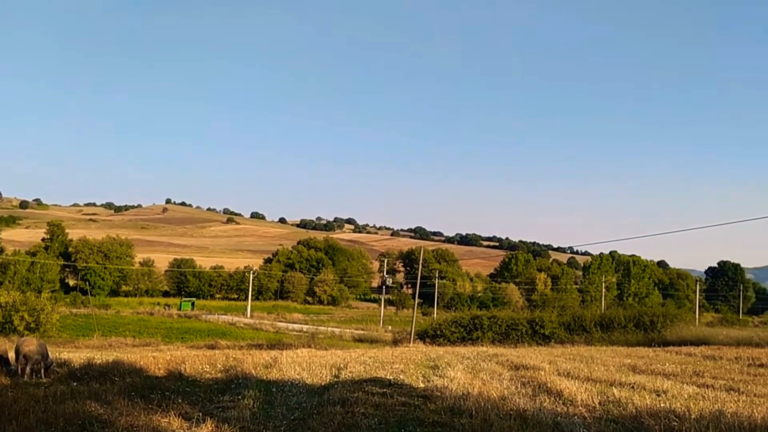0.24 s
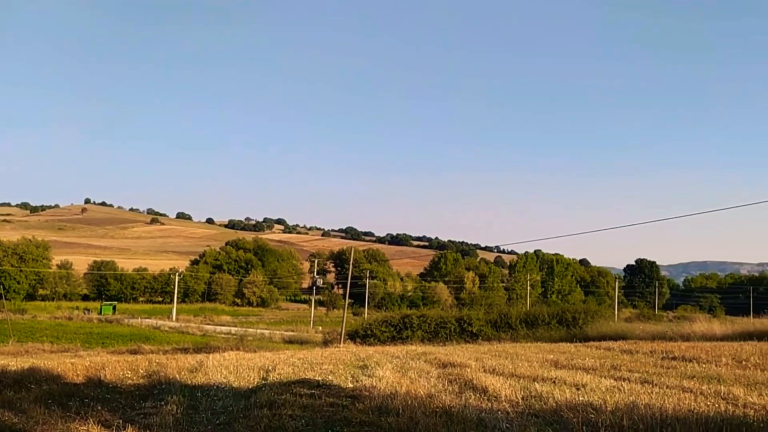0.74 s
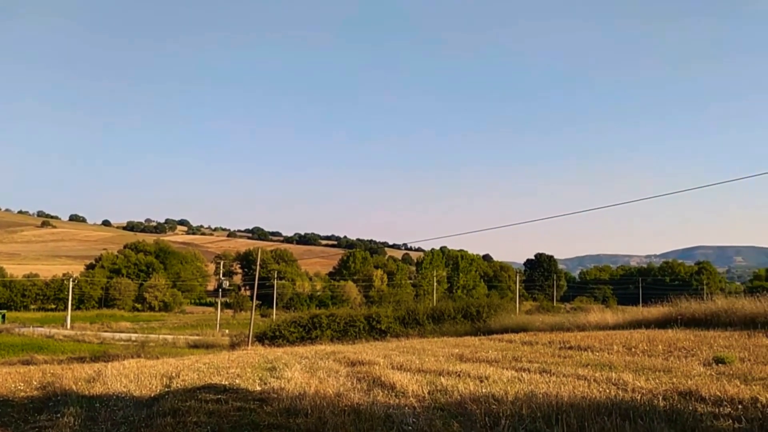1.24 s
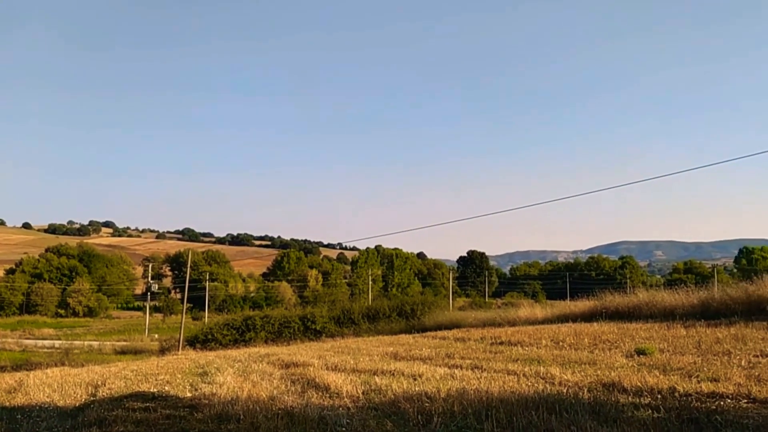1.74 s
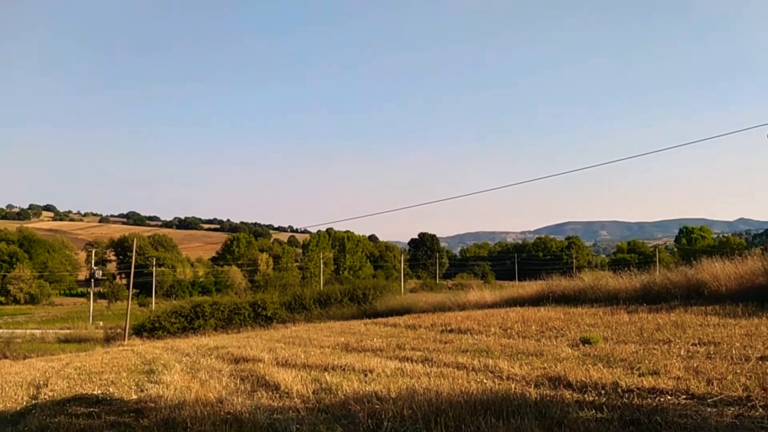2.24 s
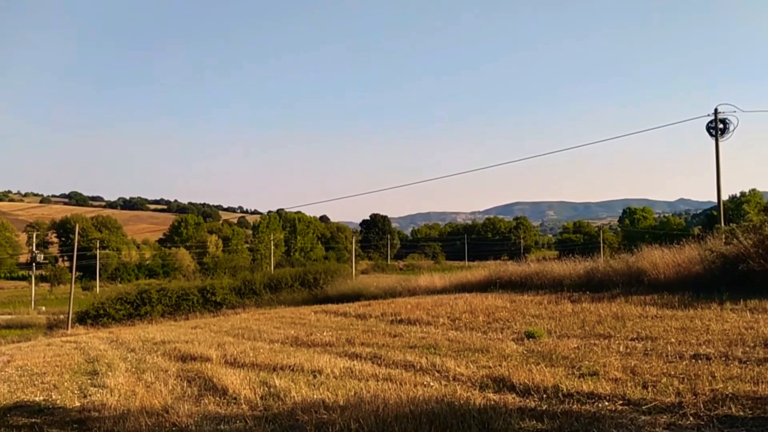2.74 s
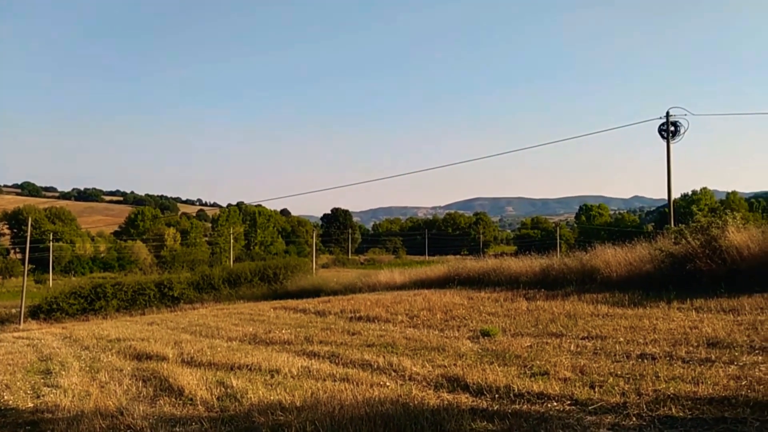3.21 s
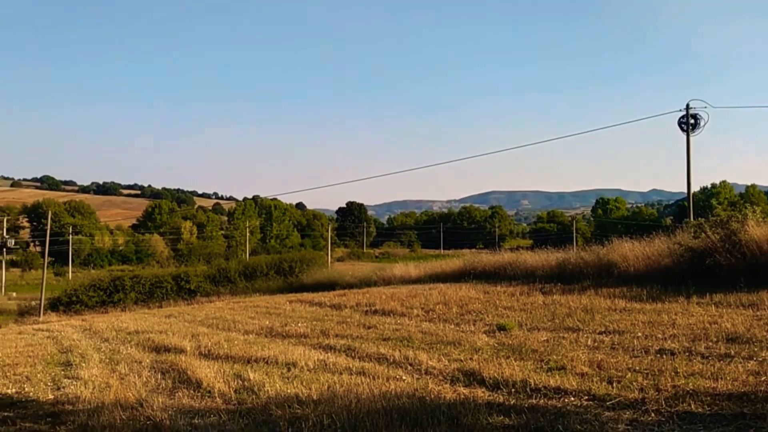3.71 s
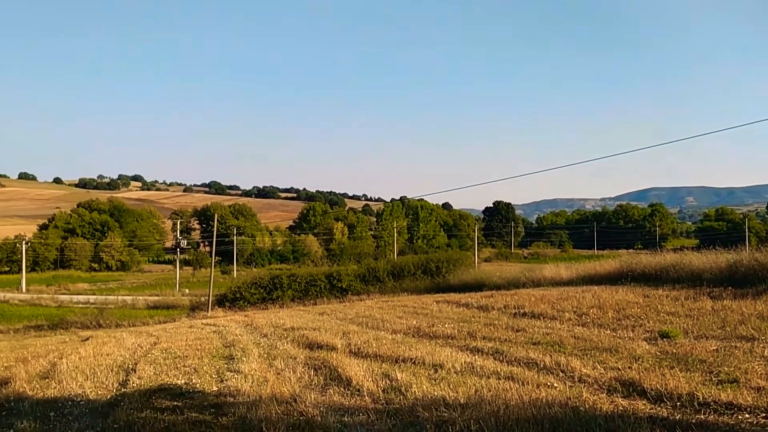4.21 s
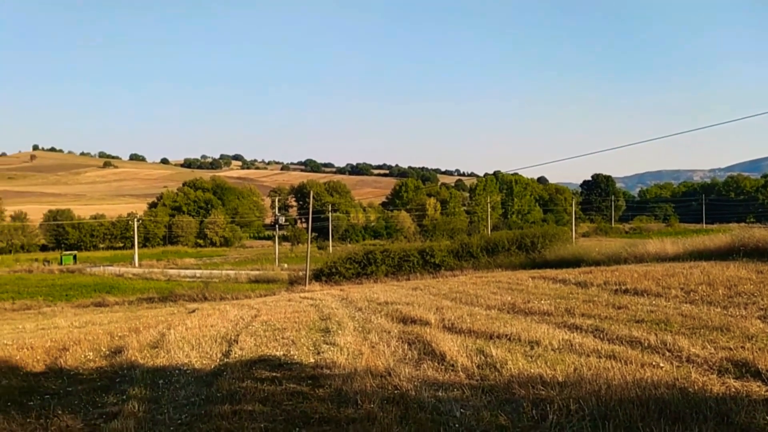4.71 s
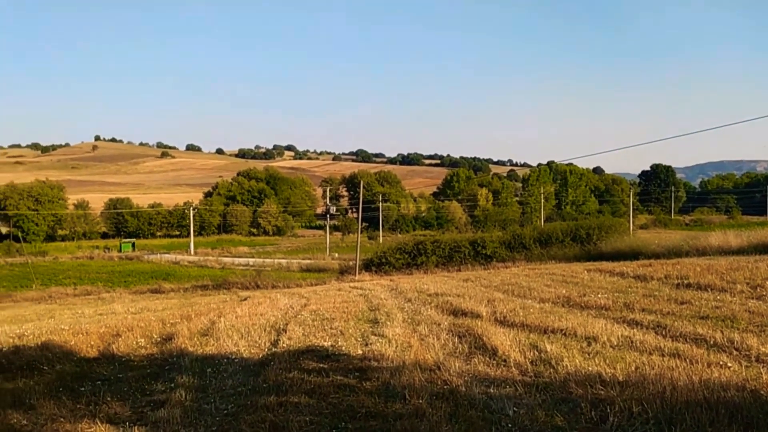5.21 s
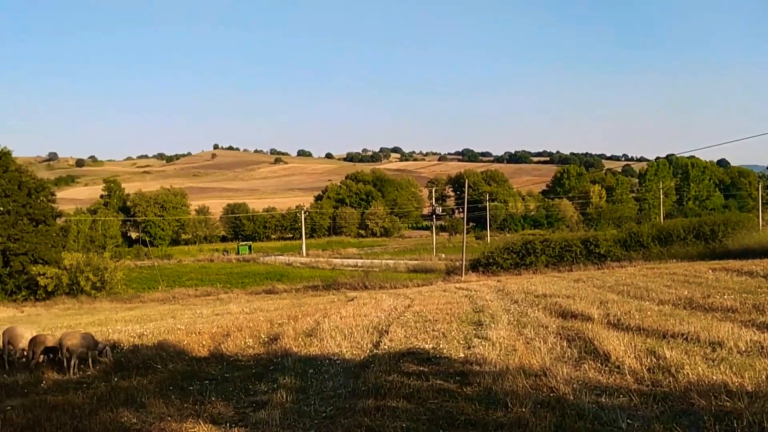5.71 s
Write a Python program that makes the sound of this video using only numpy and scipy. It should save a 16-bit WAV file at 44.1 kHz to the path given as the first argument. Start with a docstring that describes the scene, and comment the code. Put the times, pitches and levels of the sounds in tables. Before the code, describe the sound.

Sheep graze nearby in dry stubble, their bells tinkling unevenly as stalks rustle and snap in a faint breeze.

```python
"""A stubble field at dusk, among grazing sheep, on a phone's two microphone ports; the phone turns
slowly away from the flock and back. Nearby, clappers clink in a small and a larger neck bell; a low
bell knocks far off. Dry stalks rustle and snap under mouths and hooves. Light wind puffs on the left
port, over a faint country rumble and one distant chirp."""
import sys
import numpy as np
from scipy import signal
from scipy.fft import rfft, irfft, next_fast_len
from scipy.io import wavfile
from scipy.ndimage import uniform_filter1d

SR = 44100
rng = np.random.default_rng(int(sys.argv[2]) if len(sys.argv) > 2 else 0)


def inscribe(sig):
    """Save sig as 16-bit PCM at rate SR to the path in sys.argv[1].

    A 1-D sig is mono; a 2-D sig holds one channel per row.
    Samples are clipped to [-1, 1] before scaling.
    """
    pcm = np.round(np.clip(np.atleast_2d(sig).T, -1, 1) * 32767)
    wavfile.write(sys.argv[1], SR, pcm.astype(np.int16))


N = 262395

# the flock in the stubble: (time [s], stalk level [dB], tread level [dB])
GRAZING = [(0.0, -61.5, -74.5), (0.6, -60.5, -66.5), (1.4, -62.5, -73), (1.94, -55.5, -65.5),
           (2.37, -58, -67.5), (2.77, -51, -58.5), (2.95, -60, -66), (3.35, -53.5, -60.5), (3.8, -63, -61),
           (4.21, -59.5, -65.5), (4.44, -52, -58.5), (4.7, -48.5, -54), (4.81, -50.5, -58),
           (4.94, -51.5, -59), (5.07, -55, -67.5), (5.42, -55, -59.5), (5.58, -45.5, -54.5),
           (5.74, -49.5, -59.5), (5.95, -53.5, -65.5)]


def undb(db):
    """Decibels to gain."""
    return 10 ** (np.asarray(db) / 20)


def sides(pan_db):
    """Left and right gains of constant total power; pan is left minus right."""
    gain = undb(np.array([pan_db, -pan_db]) / 2)
    return gain / np.sqrt(np.mean(gain ** 2, axis=0))


def colour(x, points):
    """Shape a noise by (frequency [Hz], level [dB]) points; rms 1."""
    hz, db = np.transpose(points)
    size = next_fast_len(N)
    log_hz = np.log(np.arange(size // 2 + 1) * SR / size + 1)
    gain = undb(np.interp(log_hz, np.log([hz[0] / 2, *hz, hz[-1] * 2]), [db[0] - 40, *db, db[-1] - 40]))
    y = irfft(rfft(x, size) * gain, size)[..., :N]
    return y / np.sqrt(np.mean(y ** 2))


def walk(rate):
    """Random levels held 1 / rate s and smoothed twice; spread near 1."""
    k = int(SR / rate)
    steps = np.repeat(rng.standard_normal(N // k + 1), k)
    return 1.7 * uniform_filter1d(uniform_filter1d(steps, k), k)[:N]


def add(out, s, x):
    """Mix a short stereo sound in at s seconds."""
    i = int(s * SR)
    out[:, i:i + x.shape[1]] += x[:, :N - i]


def follow(curve):
    """Columns of a timed curve at every sample."""
    s, *columns = np.transpose(curve)
    return [np.interp(np.arange(N) / SR, s, c) for c in columns]


def at_blows(curve, blows):
    """A timed curve at the clapper blows, one row each."""
    s, *columns = np.transpose(curve)
    return np.transpose([np.interp(np.transpose(blows)[0], s, c) for c in columns])


def burst(hz, ms):
    """Noise about an octave wide that swells and dies in milliseconds; peak 1 at each port."""
    age = np.arange(1024) / SR * 1000 / ms
    noise = 0.71 * rng.standard_normal(len(age)) + 0.68 * rng.standard_normal((2, len(age)))
    band_hz = [hz / (1.3 if hz > 6000 else 1.9), min(hz * 1.27, 16000)]
    band = signal.butter(2, band_hz, "band", fs=SR, output="sos")
    x = signal.sosfilt(band, noise * age * np.exp(-2 * age))
    return x / np.abs(x).max(axis=1, keepdims=True)


def field():
    """Far rumble and air hiss, wavering slowly, with the breeze on both ports."""
    # open country: (frequency [Hz], density [dB])
    air_spectrum = [(15, 19), (25, -2), (80, 2.5), (114, -3), (141, -6), (300, -13.5), (700, -21.5),
                    (1500, -25.5), (3000, -59), (5000, -20.5), (7500, -32), (9500, -35), (12000, -15),
                    (16000, -19)]
    # its slow swell: (time [s], gain [dB])
    air_swell = [(0, 0.5), (.7, 0.8), (1.4, -1.5), (2.7, 1.9), (4.2, -1), (5.2, 0.4), (5.95, 1.5)]
    # deepest wind rumble: (time [s], level [dB])
    breeze_levels = [(0, -69.5), (3.4, -71), (3.64, -56.5), (3.8, -66.5), (5, -68), (5.95, -54)]
    air = 0.75 * rng.standard_normal(N) + 1.16 * rng.standard_normal((2, N))
    breeze = 0.74 * rng.standard_normal(N) + rng.standard_normal((2, N))
    breeze = colour(breeze, [(15, -7), (30, -3.0), (50, -5.5)]) * undb(follow(breeze_levels)[0])
    air_db = -58 + follow(air_swell)[0] + 1.4 * walk(3.98)
    return colour(air, air_spectrum) * undb(air_db) * sides(0.74)[:, None] + breeze


def far_bird():
    """One faint chirp in the distance: an arching tone made husky by fast flutter."""
    # the arch: (time [s], pitch [Hz])
    pitch_arch = [(.66, 2700), (.70, 3080), (.78, 2730)]
    s, hz = np.transpose(pitch_arch)
    time = np.arange(s[0], s[-1], 1 / SR)
    tone = np.sin(2 * np.pi * np.cumsum(np.interp(time, s, hz)) / SR)
    tone *= walk(400)[:len(time)] * np.hanning(len(time))
    out = np.zeros((2, N))
    add(out, s[0], undb(-68) * np.array([tone, tone]))
    return out


def wind_puffs():
    """Gusts tumble over the left port and thump it."""
    # gusts: (time [s], length [s], level [dB], upper edge [Hz])
    port_gusts = [(1.936, 0.019, -58, 496), (2.039, 0.0078, -53.5, 490), (2.087, 0.02, -55, 597),
                  (2.199, 0.017, -53.5, 500), (2.315, 0.054, -53, 547), (2.871, 0.01, -49.5, 337),
                  (3.412, 0.028, -49.5, 570), (3.644, 0.022, -52, 535), (4.902, 0.069, -47.5, 790)]
    out = np.zeros((2, N))
    for s, length, db, top_hz in port_gusts:
        size = int(length * SR)
        band = signal.butter(2, [120, top_hz], "band", fs=SR, output="sos")
        gust = signal.sosfilt(band, rng.standard_normal(size + 2000))[2000:]
        add(out, s, undb(db) * np.array([[1], [.15]]) * gust / gust.std() * np.hanning(size) ** 0.11)
    return out


def grains(rate, scatter_db, alike):
    """Dense tiny cracks of uneven size; both ports share the fraction `alike` of their power."""
    sizes = (rng.random(N) < rate / SR) * undb(scatter_db * rng.exponential(size=N).clip(0, 3.5))
    tail = np.exp(-np.arange(200) / SR / .0008)
    envelope = np.sqrt(signal.fftconvolve(sizes ** 2, tail)[:N].clip(0))
    shared = np.sqrt(alike) * rng.standard_normal(N)
    return envelope * (shared + np.sqrt(1 - alike) * rng.standard_normal((2, N)))


def rustle():
    """Grass tearing crackles in the treble; hooves and bodies in the stubble give duller noise."""
    # tearing and treading: (frequency [Hz], density [dB])
    stalk_spectrum = [(900, -10.5), (1500, -6), (2900, -8), (3600, -9), (4600, -16.5), (6900, -9.5),
                      (8500, 1), (9840, 4.04), (11500, -8.5), (13000, -11.5), (16000, -37)]
    tread_spectrum = [(100, -10), (200, -3), (500, -3.5), (1000, -6), (2000, -7), (4000, -16)]
    stalk_db, tread_db = follow(GRAZING)
    stalks = colour(grains(1400, 0.52, alike=0.021), stalk_spectrum) * undb(stalk_db + 1.7 * walk(25))
    stalks *= sides(2.9 + 1.1 * walk(3.59))
    tread = colour(grains(900, 1.17, alike=0.57), tread_spectrum) * undb(tread_db + 1.76 * walk(35))
    return stalks + tread


def snaps_and_clanks(lesser_per_s=25):
    """Sharp clicks: stalk snaps and the clank of clappers on the bells; lower ones last longer.
    Lesser stalk snaps come at random, louder as the rustle swells."""
    # snaps and clanks: (time [s], peak [dB], pitch [Hz], pan [dB])
    sharp_clicks = [(0.232, -16.5, 7800, -24), (.3087, -38, 3200, 17), (0.31, -33, 9500, 4),
                    (0.4194, -38, 7900, 17), (0.4533, -33.5, 2650, 9), (0.4552, -33.5, 9100, 22),
                    (.642, -32.5, 6500, 6), (1.296, -40, 7740, 3), (1.5598, -37, 7360, 2),
                    (2.3146, -40, 5450, -19), (2.495, -43.5, 1300, 1.1), (2.7734, -30, 2120, 8),
                    (2.786, -47, 2170, 18), (3.0051, -45, 2200, .1), (3.033, -39, 10500, 3),
                    (3.0905, -43, 900, 3), (3.2128, -42.5, 3000, 5), (3.4248, -36, 7800, -2),
                    (3.659, -38, 9300, 6), (3.8253, -36.5, 9500, 15), (3.8665, -34.5, 11200, -2.1),
                    (4.693, -28.5, 9600, 4), (4.718, -27.5, 6500, 7), (4.7325, -25, 10200, 5),
                    (4.7774, -30, 8100, 19), (4.8907, -36.5, 2270, -22), (4.958, -32.5, 9700, 3),
                    (5.0797, -35, 8950, -3), (5.1096, -36, 8280, 2.5), (5.2272, -36, 10500, 4),
                    (5.4799, -34.5, 7700, 12), (5.6005, -40.5, 9300, 8), (5.6053, -36.5, 1450, 4),
                    (5.6863, -35, 8150, -8)]
    out = np.zeros((2, N))
    moment, force, pitch, side = rng.random((int(lesser_per_s * N / SR), 4)).T
    when = moment * (N / SR - .03)
    stalk_db = np.interp(when, *np.transpose(GRAZING)[:2])
    lesser = zip(when, stalk_db + 1 + 9.7 * (force - .5), 6200 * 2.46 ** pitch, 3.8 + 66 * (side - .5))
    for s, db, hz, pan_db in [*sharp_clicks, *lesser]:
        add(out, s, undb(db) * sides(pan_db)[:, None] * burst(hz, ms=0.9 + 900 / hz))
    return out


def excite(blows, response):
    """Level [dB] of each mode group at each blow: hard blows are brighter, and the rim spot
    favours the mode whose pair side has the same sign."""
    _, strength, hardness, spot = np.transpose(blows)[..., None]
    offset_db, share, side, off_middle = np.transpose(response)
    spot_db = np.minimum(side * spot, 0) - off_middle * abs(spot)
    loose = (side == 0) & (np.arange(len(response)) > 0)  # unpaired groups above the lowest
    scatter_db = 2.5 * loose * rng.standard_normal((len(blows), len(response)))
    return strength + offset_db + share * hardness + spot_db + scatter_db


def bell(blows, group_db, pitches, rings, pan_hz, pans_db, leads_ms, rise_ms, clank_db):
    """Each blow clanks and sets the modes ringing; only those it outdoes take a new phase."""
    times = np.transpose(blows)[0]
    out, remaining_db, phase = np.zeros((2, N)), {}, {}
    waver = undb(1.6 * walk(90))  # the bell swings and brushes the fleece
    drift = 0.00096 * walk(30)  # the swing also bends the pitch a little
    for s, until, levels, pans, lead in zip(times, [*times[1:], N / SR], group_db, pans_db, leads_ms):
        age = np.arange(int(min(until - s + rise_ms / 1000, N / SR - s, .3) * SR)) / SR
        gate = np.clip(age * 1000 / rise_ms, 0, 1) * np.clip((age[-1] - age) * 1000 / rise_ms, 0, 1)
        at_port = int(s * SR) / SR + age + np.array([[lead], [-lead]]) / 2000  # the left port leads
        bend = np.cumsum(drift[int(s * SR):][:len(age)]) / SR
        clank = burst(8240, ms=2) + 0.14 * burst(2120, ms=25) + 0.15 * burst(4400, ms=1.2)
        add(out, s, undb(max(levels) + clank_db) * sides(pans[-1])[:, None] * clank)
        for db, group_hz, group in zip(levels, pitches, rings):
            for hz, (t60, mode_db) in zip(group_hz, group):
                new_phase = rng.random()
                sway = np.roll(waver, rng.integers(N))[:len(age)]
                if hz != group_hz[0]:
                    sway = sway * undb(1.5 * rng.standard_normal())  # each blow hits another spot
                if db > remaining_db.get(hz, -120) + 4:
                    phase[hz] = new_phase
                remaining_db[hz] = db - 60 * (until - s) / t60
                beam_db = 8.3 * (hz > 11800)  # the highest modes beam towards the left port
                pan_db = np.interp(np.log(hz), np.log(pan_hz), pans) + beam_db
                tone = np.sin(2 * np.pi * (hz * (at_port + bend) + phase[hz]))
                envelope = np.exp(-np.log(1000) * age / t60) * gate * sway
                add(out, s, undb(db + mode_db) * sides(pan_db)[:, None] * tone * envelope)
    return out


def far_bell():
    """A low bell far across the field knocks with one short mode."""
    # clapper: (time [s], strength [dB], hardness [dB], rim spot [dB])
    blows = [(4.114, -61, 0, 0), (4.156, -55, 0, 0), (5.351, -55.5, 0, 0), (5.894, -54.5, 0, 0)]
    # the mode: (pitch [Hz]), then its (t60 [s], gain [dB])
    pitches = [
        [685],
    ]
    rings = [
        [(0.152, 1.5)],
    ]
    # all zero, so strength alone counts: (offset [dB], hardness share, pair side, off-middle loss)
    response = [(0, 0, 0, 0)]
    return bell(blows, excite(blows, response), pitches, rings, pan_hz=[685],
                pans_db=[[1.8]] * len(blows), leads_ms=[0] * len(blows), rise_ms=2.5, clank_db=-30)


def large_bell():
    """The larger neck bell near the phone: fewer blows, with a strong clank."""
    # clapper: (time [s], strength [dB], hardness [dB], rim spot [dB])
    blows = [(0.133, -64.5, 21, 12), (0.306, -49, -3, 12), (0.495, -48.5, 1.5, -12),
             (0.907, -48, -11.5, -18), (1.295, -49, -7.5, 15), (1.562, -49.5, -14, 0.5),
             (1.791, -52, -4.5, 18), (1.974, -56, -10, 0), (2.078, -45, -17, -12), (2.314, -45.5, 0, 16),
             (2.574, -42.5, -15, 1), (2.887, -56, -34, -2.1), (3.505, -50.5, -25, -16),
             (4.648, -47, -18, 5), (4.738, -47, -16, -7), (4.96, -53.5, -10.5, 4),
             (5.132, -43.5, -19.5, -25), (5.317, -48.5, -19, -16), (5.836, -48, -18, -21)]
    # modes, grouped as they ring together: (pitch [Hz]), then each one's (t60 [s], gain [dB])
    pitches = [
        [1239],
        [3420],
        [3631],
        [6328],
        [6533],
        [9790, 10152, 14262],
    ]
    rings = [
        [(.25, 0.75)],
        [(0.19, 1)],
        [(0.298, -0.6)],
        [(.25, 0.1)],
        [(.22, 0.12)],
        [(0.048, 1), (0.09, 3.5), (0.1, -3.5)],
    ]
    # each group's answer: (offset [dB], hardness share, pair side, off-middle loss [dB/dB])
    response = [(2.5, 0, -0.39, 0), (-4, 0.44, -.8, 0), (-5.5, 1, 1, 0.0053), (-2, 0.72, 1, -0.097),
                (4.5, 0.97, -1.26, 0), (5.6, 0.46, 0, 0.024)]
    # bearing as the phone turns: (time [s], low pan [dB], high pan [dB])
    bearing = [(0, .6, 6.2), (1.3, -2.5, 8), (3.5, -5.5, 6.7), (4.8, -0.5, 6), (5.15, 10, 4.3),
               (5.95, 9, 2.1)]
    return bell(blows, excite(blows, response), pitches, rings, pan_hz=[1239, 6400],
                pans_db=at_blows(bearing, blows), leads_ms=[0.467] * len(blows), rise_ms=2.1, clank_db=2)


def small_bell():
    """The small bell nearby twists on its strap, so its top modes beam now here, now there."""
    # clapper: (time [s], strength [dB], hardness [dB], rim spot [dB])
    blows = [(0.027, -43.5, 8.5, -13.5), (0.177, -54, 18.5, 2), (0.229, -35.5, 19, 11.5),
             (0.25, -36, 5.5, 7), (0.327, -34, 6, -44), (0.409, -36, 11, -20), (0.422, -52.5, 21, -18),
             (0.502, -41.5, -1, -14), (0.561, -39.5, -19, 0), (0.643, -24.5, -10, 1.5), (0.87, -44, 8, -12),
             (1.106, -45.5, 0.5, 5), (1.219, -58.5, 10, 10), (1.308, -43, 4, 1), (1.55, -49.5, 1, 5),
             (1.624, -38.5, -3, -30), (1.72, -38.5, 3.5, -7), (1.834, -41.5, 8, -21),
             (1.905, -41, 9.5, -15), (1.983, -42, -5, -5), (2.093, -32, -4, -22), (2.184, -42.5, -7, 16),
             (2.343, -39.5, -3.5, -38), (2.428, -41, -8.5, 17), (2.504, -34.5, -8, -4),
             (2.569, -44.5, -1, 14), (2.746, -32.5, 3, -14), (2.801, -45.5, -9, -3),
             (2.951, -42.5, 3.5, 0.5), (3.072, -50, -6, -2.1), (3.101, -43, -5, 6), (3.155, -46, 18, 2.5),
             (3.237, -36.5, 8, -24), (3.304, -52, 10, 3), (3.377, -33, -13.5, -12), (3.605, -41, 1.5, -14),
             (3.773, -43, 1.5, 7), (3.959, -35.5, -1, 24), (4.127, -49.5, 14.5, 39),
             (4.277, -43.5, 5.5, -46), (4.412, -51.5, 22.5, -35), (4.458, -39, 6.5, -53),
             (4.481, -36.5, -18, 7), (4.541, -46, 14.5, -4), (4.712, -47.5, 26, 7), (4.728, -38, -15, 10),
             (4.772, -48.5, 20, 6), (4.876, -43, 15.5, -1), (5.042, -60.5, 22, 18),
             (5.389, -51, 21.5, -5.5), (5.447, -48, 3, 3), (5.471, -29, 0, -4), (5.543, -43.5, 26, 6.5),
             (5.559, -35.5, 1.5, -5), (5.707, -39.5, 1, 14), (5.741, -46.5, -6, -5), (5.89, -38.5, 1.5, .1)]
    # modes, grouped as they ring together: (pitch [Hz]), then each one's (t60 [s], gain [dB])
    pitches = [
        [1754],
        [5236, 4846],
        [9097],
        [9384, 2260],
        [12265],
        [14010],
    ]
    rings = [
        [(0.088, 0.18)],
        [(0.19, 1.3), (0.097, -7.5)],
        [(0.075, 3.3)],
        [(.11, -1.5), (.15, -24)],
        [(.18, 12)],
        [(0.059, 6.9)],
    ]
    # each group's answer: (offset [dB], hardness share, pair side, off-middle loss [dB/dB])
    response = [(1.53, 0, -0.1, 0), (-9.5, 0.45, 0, 0.18), (-1, 0.87, 0.64, 0), (1.66, 0.96, -1.4, 0),
                (-25.5, 0.55, 0, 0.47), (-16, 0.89, 0, 0.028)]
    # as the phone turns: (time [s], left lead [ms], low pan [dB], middle pan [dB], high pan [dB])
    bearing = [(0, 0.2, 4, 1, -3), (.23, 0.242, 7.5, 1, 4), (.4, .24, 7, 2, -0.5), (.65, 0.25, 6.5, 4, 3),
               (.87, -.1, 11, 2.5, .6), (1.1, -.19, 3, 7, -7), (1.6, -0.19, 1, 4, -4),
               (1.9, -0.078, 6, -16, -1), (2.1, -0.13, 5.5, -15, 6), (2.75, -0.089, 3, -8.5, 9),
               (3.2, -0.036, 5, -16, 0.5), (3.7, -0.02, 4, 7, 8), (4.0, -0.16, -1, .1, 29),
               (4.5, -0.19, 2.1, 21, -8), (5.1, -.18, -2, -9, 1), (5.38, 0.23, 9, -3, -2),
               (5.95, 0.067, 8, 5, 0)]
    # the 5 kHz ring swells and fades: (time [s], gain [dB])
    middle_swell = [(0, 0.5), (1.15, 3.5), (1.9, 0.7), (2.6, 3), (3.3, 2.5), (4.0, -2.1), (4.45, -2),
                    (4.8, 1.5), (5.4, 1.5), (5.6, 0), (5.95, -4)]
    turn = at_blows(bearing, blows)
    twist_db = 3 * rng.standard_normal((len(blows), 3)) * [0, 1, 1]
    group_db = excite(blows, response)
    group_db[:, 1:2] += at_blows(middle_swell, blows)
    group_db[:, 4:] -= 5.5 * rng.exponential(size=(len(blows), 2))  # these ring only at some spots
    return bell(blows, group_db, pitches, rings, pan_hz=[1754, 5236, 9200],
                pans_db=turn[:, 1:] + twist_db, leads_ms=turn[:, 0], rise_ms=3.58, clank_db=-12)


def scene():
    """Bells, grazing, wind and the open field, as they reach the phone."""
    bells = small_bell() + large_bell() + far_bell()
    return bells + snaps_and_clanks() + wind_puffs() + rustle() + field() + far_bird()


def record(dry):
    """The phone's right port is duller at the very top; both are cut off near 16 kHz."""
    top = signal.sosfiltfilt(signal.butter(4, 11800, "high", fs=SR, output="sos"), dry)
    heard = dry - np.array([[0], [.65]]) * top
    return signal.sosfilt(signal.ellip(10, .3, 75, 15950, fs=SR, output="sos"), heard)


dry = scene()
out = record(dry)
inscribe(out)
```